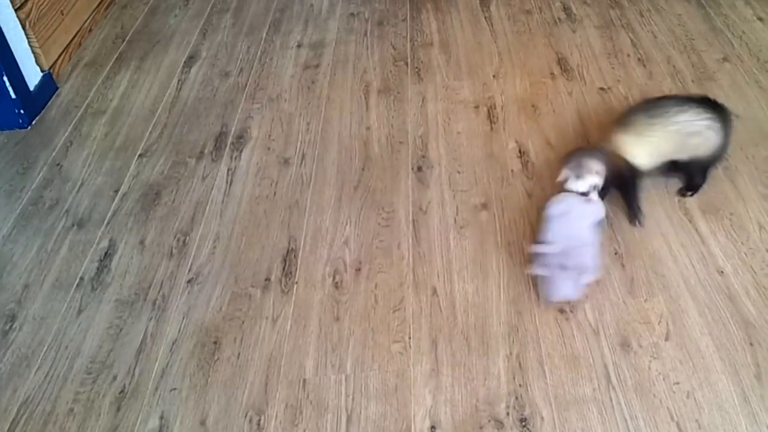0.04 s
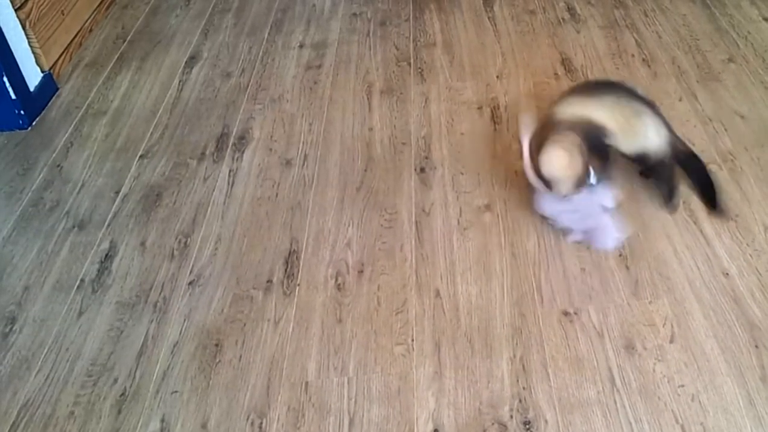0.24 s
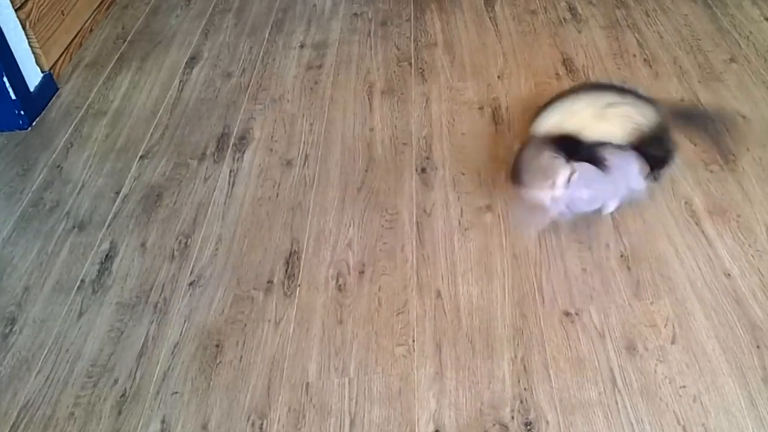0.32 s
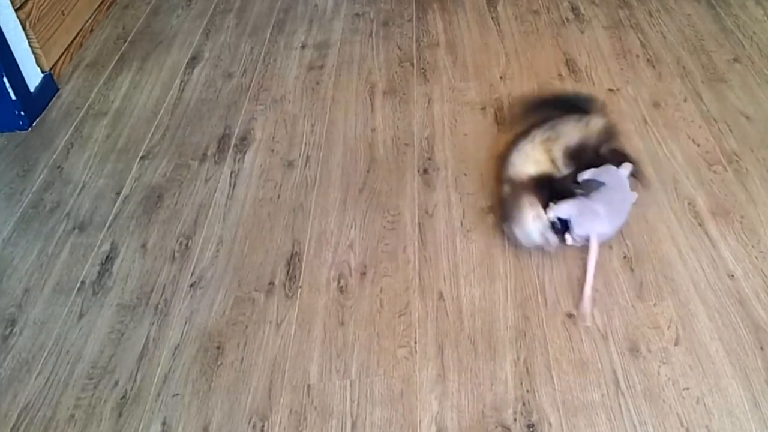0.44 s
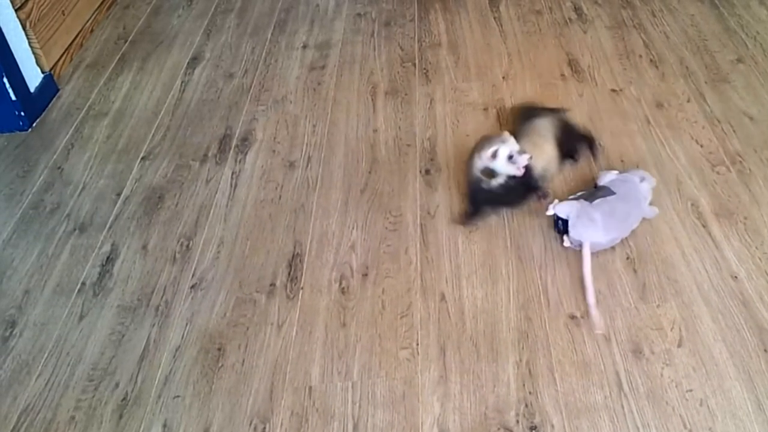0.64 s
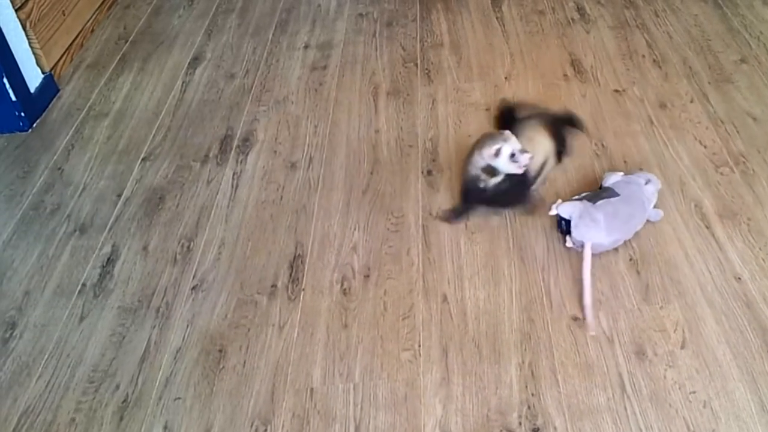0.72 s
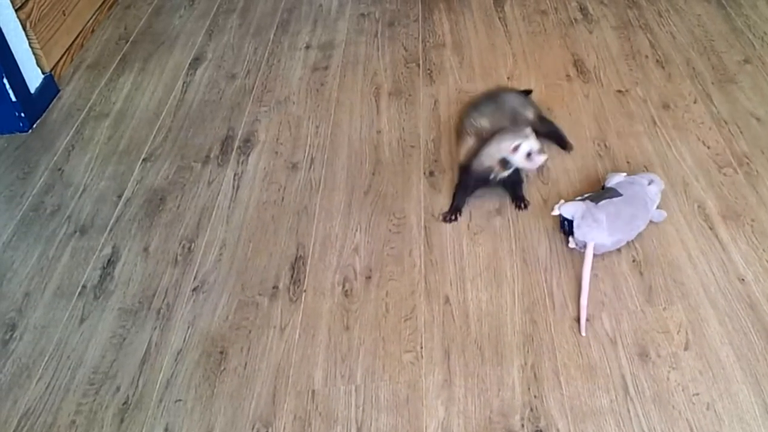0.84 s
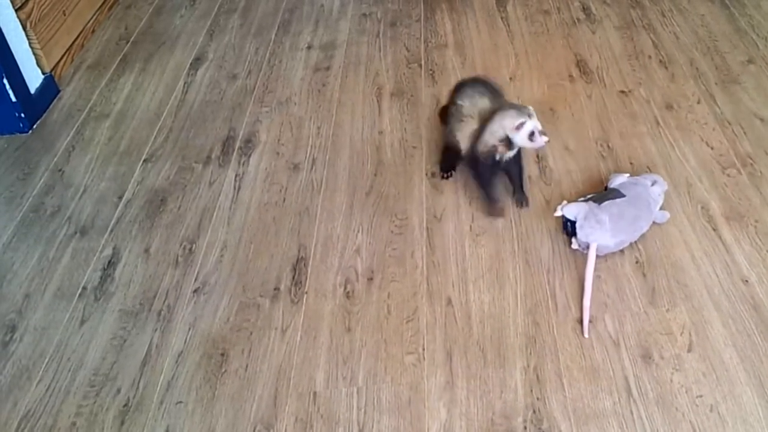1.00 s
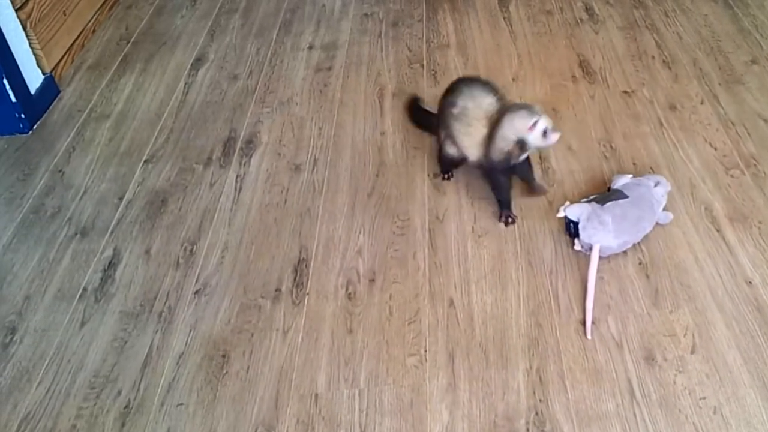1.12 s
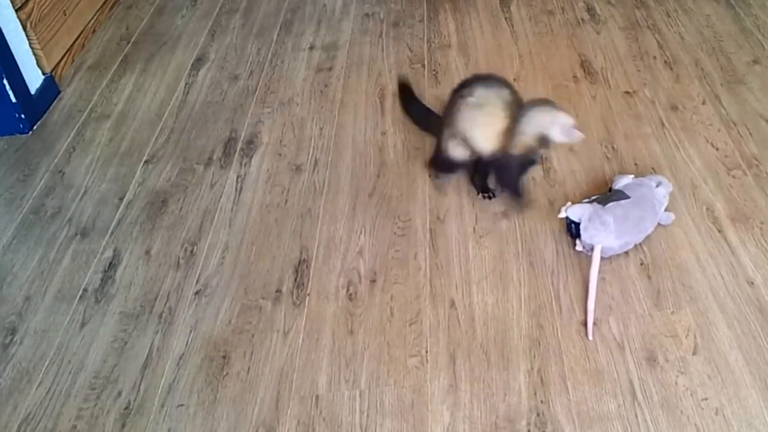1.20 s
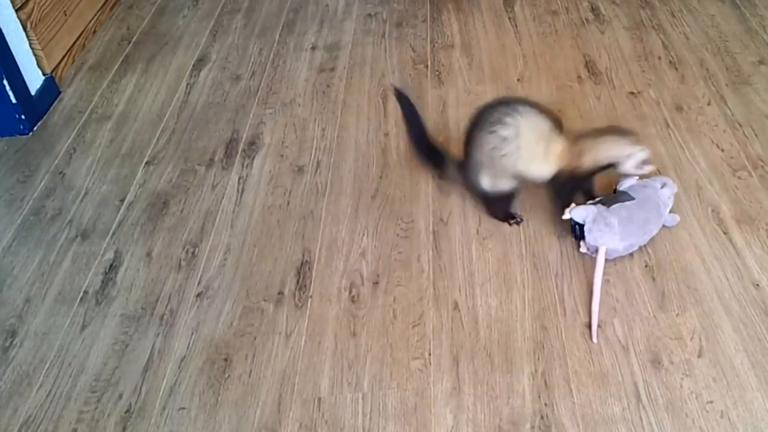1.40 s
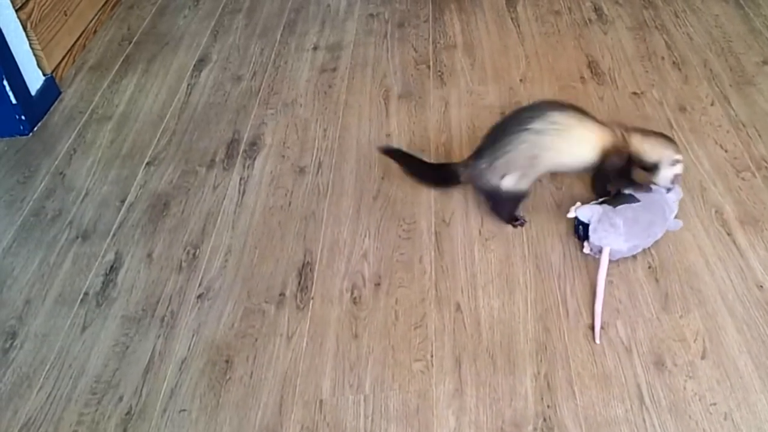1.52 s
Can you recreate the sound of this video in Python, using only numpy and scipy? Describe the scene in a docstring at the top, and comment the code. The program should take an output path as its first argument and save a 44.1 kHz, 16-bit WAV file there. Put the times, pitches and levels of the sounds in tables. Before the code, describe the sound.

A toy knocks three times on a laminate floor as a ferret shakes it, each a clack with a hollow boom. Then claws tick, paws slide and plush scuffs softly in a slightly echoing room.

```python
"""Claws tick and plush scuffs on the laminate floor of a live room: a ferret is shaking a soft toy.
It knocks the toy's hard core down three times, each a clack and a hollow boom of the boards,
then scampers round it, paws thumping and sliding, claws rasping. Two unlike microphone ports
pick it up, left and right, and the hardest knocks overload them."""
import sys
import numpy as np
from scipy import signal
from scipy.fft import rfft, irfft
from scipy.io import wavfile

SR = 44100
rng = np.random.default_rng(int(sys.argv[2]) if len(sys.argv) > 2 else 0)


def wav_record(signal):
    """Record a signal, one row per channel, as 16-bit PCM in the file named by sys.argv[1]."""
    frames = np.transpose(np.atleast_2d(signal))
    bounded = np.clip(frames, -1, 1)
    # unit amplitude maps onto the largest positive 16-bit level
    quanta = np.round(bounded * 32767).astype(np.int16)
    wavfile.write(sys.argv[1], SR, quanta)


N = 68355
T = np.arange(N) / SR


def from_db(db):
    """Decibels to gain."""
    return 10 ** (np.asarray(db) / 20)


def at_hz(points, hz):
    """Read a table on a log-frequency axis."""
    f, v = np.transpose(points)
    return np.interp(np.log(hz), np.log(f), v)


def rms_one(x):
    """Scale to unit rms."""
    return x / np.sqrt(np.mean(x ** 2) + 1e-20)


def colour(x, points):
    """Causal (minimum-phase) filter through points of f/Hz, level/dB."""
    hz = np.maximum(np.fft.rfftfreq(4 * N, 1 / SR), 1)
    cepstrum = irfft(np.log(from_db(at_hz(points, hz))))
    size = len(cepstrum)
    cepstrum[1:size // 2] *= 2
    cepstrum[size // 2 + 1:] = 0
    return irfft(rfft(x, size) * np.exp(rfft(cepstrum)))[..., :N]


def convolve(x, response):
    """Play x through a response, per channel."""
    return signal.fftconvolve(np.atleast_2d(x), np.atleast_2d(response), axes=1)[:, :N]


def impulses(rows):
    """One impulse for each row of t/s, level/dB."""
    out = np.zeros(N)
    for s, db in rows:
        out[max(int(s * SR), 0)] += from_db(db)
    return out


def swell(t, peak_s):
    """An envelope that rises to 1 at peak_s and dies away."""
    return t / peak_s * np.exp(1 - t / peak_s)


def diffuse(alike_below_hz=455):
    """White noise from all round, alike at both ports in the bass only."""
    alike = 1 / (1 + (np.fft.rfftfreq(N, 1 / SR) / alike_below_hz) ** 2)
    spectra = rfft(rng.standard_normal((2, N)))
    mid, side = irfft(spectra * np.sqrt([1 + alike, 1 - alike]), N)
    return np.array([mid + side, mid - side]) / np.sqrt(2)


def room(x, build_s=0.002):
    """The live room: reverberation builds quickly and lingers longest in the bass."""
    decay_times = [(100, 0.78), (350, 0.48), (1000, 0.49), (2500, 0.48), (5000, 0.36), (12000, 0.35)]  # reverberation: f/Hz, t60/s
    edges_hz = [0, 180, 500, 1400, 3500, 7000, SR]
    noise, hz, tail = rfft(diffuse()), np.fft.rfftfreq(N, 1 / SR), 0
    for low, high in zip(edges_hz, edges_hz[1:]):
        band = irfft(noise * ((hz >= low) & (hz < high)), N)
        t60 = at_hz(decay_times, (low + high) / 2)
        tail += band * from_db(-60 * T / t60)
    response = rms_one(tail * (1 - np.exp(-T / build_s))) / np.sqrt(N)
    return convolve(x, response)


def room_tone():
    """The low, steady hush of the room."""
    spectrum = [(25, -8.5), (70, -0.5), (150, 1.5), (330, 5.5), (700, -1.5), (1400, -9.5), (2500, -17),
                (14000, -32)]  # background noise: f/Hz, level/dB
    return from_db(-52) * rms_one(colour(diffuse(), spectrum))


def scuffing(grains_per_s=2100, grain_db=-7.5, spread_db=5):
    """Fur and plush rub the floor: a soft hiss with tiny catches in it."""
    vigour = [(0, -37.5), (.08, -48.5), (.135, -45), (.21, -52), (.24, -39.5), (.29, -35), (.325, -31.5),
              (.40, -34), (.47, -34), (.57, -44), (.64, -36), (.69, -40.5), (.745, -37), (.80, -43.5),
              (.92, -40), (.98, -48), (1.04, -45.5), (1.14, -50.5), (1.19, -47), (1.255, -44), (1.34, -55),
              (1.385, -43), (1.42, -51.5), (1.48, -53.5), (1.55, -45.5)]  # strength of the rubbing: t/s, level/dB
    spectrum = [(100, -20), (240, -8), (400, 9.5), (750, -0.5), (1400, 7), (2000, -0.5), (2500, -1),
                (3400, 2.5), (4700, 4.5), (6000, 7), (8300, -2), (12000, -2.5), (15000, -5.5)]  # fabric hiss: f/Hz, level/dB
    sizes = from_db(spread_db * np.minimum(rng.exponential(1, N), 5))
    catches = rng.random(N) < grains_per_s / SR
    grains = sizes * catches * rng.standard_normal((2, N))
    rub = rms_one(colour(diffuse() + from_db(grain_db) * rms_one(grains), spectrum))
    return from_db(0.5 + np.interp(T, *np.transpose(vigour))) * rub


def paw_scrapes():
    """A paw slides on the laminate: friction bites at once and fades."""
    slides = [(0.0, 0.017, -54), (0.738, 0.097, -34.5), (1.173, 0.073, -47), (1.424, 0.048, -45.5),
              (1.52, 0.04, -39.5)]  # paw slips: t/s, length/s, level/dB
    spectrum = [(200, -21), (600, -0.5), (1600, 8), (2400, 2), (4000, -3), (7000, -10.5), (14000, -29)]  # friction noise: f/Hz, level/dB
    level = 0
    for s, length, db in slides:
        corners_s = [s, s + 0.0021, s + length / 2, s + length * 0.91]
        level += from_db(db) * np.interp(T, corners_s, [0.044, 0.89, 0.59, 0.0095])
    return level * rms_one(colour(diffuse(), spectrum))


def claw_ticks(grit_s=0.003, grit_db=-10, echo_s=0.0024):
    """Claws and hard parts snap with a little grit; a near surface returns a briefly ringing echo."""
    clicks = [(0.002, -13.5, -33, 4380), (0.094, -20.5, -43.5, 4900), (0.13, -24.5, -33, 4920),
              (0.2226, -21.5, -25.5, 4510), (0.3, 0, -11, 4760), (0.4937, -8, -12.5, 4680),
              (0.510, -16.5, -15, 4370), (0.688, -42, -43, 4700), (0.706, -26, -28.5, 4870),
              (0.834, -24, -37.5, 4680), (1.100, -21.5, -28, 5010), (1.1647, -33, -32, 4350),
              (1.2157, -32.5, -32, 4900), (1.22, -39, -35.5, 4410), (1.286, -35, -37, 4610),
              (1.352, -23.5, -34, 4640), (1.503, -37, -48, 4780), (1.522, -27, -33.5, 4500)]  # hard contacts: t/s, snap level/dB, ring level/dB, ring f/Hz
    spectrum = [(300, -19), (1500, -6), (2500, -18), (4700, 2), (7000, -2.5), (14000, -3)]  # the snap: f/Hz, level/dB
    snap_gain, echo_gain = from_db([[-0.5], [3]]), from_db([[-8.5], [-2.5]])  # left, right
    hits = impulses([row[:2] for row in clicks])
    grit = from_db(grit_db) * convolve(hits, np.exp(-T / grit_s))[0] * rng.standard_normal(N)
    snap = colour(hits + grit, spectrum)
    echo, t = np.zeros(N), T[:SR // 100]
    for s, _, ring_db, hz in clicks:
        phase = 2 * np.pi * hz * t
        ring = np.sin(phase) + from_db(-5.5) * np.cos(0.89 * phase)  # with a weaker, lower mode
        start = int((s + echo_s) * SR)
        echo[start:start + len(t)] += from_db(ring_db) * swell(t, peak_s=0.00086) * ring
    reverb = room(from_db(-2) * snap + from_db(-7.5) * echo)
    return snap_gain * snap + echo_gain * echo + reverb


def floor_thumps(room_db=-22):
    """The hollow floor answers each landing with a short, swelling boom."""
    landings = [(0.006, -26.5), (0.115, -35.5), (0.223, -1.5), (0.2965, 16), (0.427, -1), (0.472, -8),
                (0.495, 6.5), (0.512, 11), (0.574, -6), (0.627, -22.5), (0.665, -21), (0.700, -13.5),
                (0.985, -33.5), (1.055, -29.5), (1.112, -37), (1.240, -35.5), (1.357, -28.5),
                (1.426, -35.5), (1.495, -37.5)]  # weight of toy, body or paw on the boards: t/s, level/dB
    board_modes = [(148, -54, -39.5, 0.03), (226.6, -22.5, -29.5, 0.021), (267.2, -18, -21, .018),
                   (336.3, -3, -13, 0.013), (422.8, -19.5, -17, 0.015)]  # resonances: f/Hz, left level/dB, right level/dB, rise/s
    boom = 0
    for hz, left_db, right_db, peak_s in board_modes:
        envelope = swell(T, peak_s) ** 4.06
        boom += from_db([[left_db], [right_db]]) * envelope * np.sin(2 * np.pi * hz * T)
    direct = convolve(impulses(landings), boom)
    return direct + from_db(room_db) * room(direct)


def body_flops(right_db=-13.5):
    """The soft body flops on the floor: dull, low thuds, mostly in the left port."""
    falls = [(0.114, -42.5), (0.225, -32), (0.425, -19), (0.497, -22), (0.61, -34), (0.66, -33),
             (0.77, -49), (1.055, -54)]  # soft landings: t/s, level/dB
    spectrum = [(25, -22), (55, -16.5), (90, -9), (140, 0), (200, 1.5), (300, -14), (700, -41.5),
                (3000, -77)]  # the thud: f/Hz, level/dB
    envelope = convolve(impulses(falls), swell(T, peak_s=0.021) ** 2)
    return envelope * rms_one(colour(diffuse(), spectrum)) * from_db([[0], [right_db]])


def toy_knocks():
    """The hard core rings toy and boards and fills the room; the third knock strikes twice."""
    contacts = [(0.2234, -0.5, -3.5, 1520), (0.2966, 13.5, -6.5, 2780), (0.4929, -1.5, 5.5, 5030),
                (0.5100, 4.5, -4, 4040)]  # core on floor: t/s, level/dB, relative room send/dB, low-pass f/Hz
    modes = [(405.5, -15.5, 0.079), (517, -10.5, 0.037), (609, -12.5, 0.026), (816, -14, 0.044),
             (975, -20, 0.096), (1115, -19, 0.05), (1258, -21.5, .05), (1557, -24.5, 0.04),
             (2260, -19, .015), (3208, -25.5, 0.027)]  # resonances of toy and floor: f/Hz, level/dB, t60/s
    room_spectrum = [(30, -35.5), (90, -16), (170, -14), (260, 6), (340, -1.5), (430, 6.5), (600, -2),
                     (800, -5.5), (1030, -3), (1500, -11), (2500, -21.5), (4500, -20), (8000, -34.5),
                     (14000, -41.5)]  # the clack as the room returns it: f/Hz, level/dB
    ring = sum(from_db(db - 60 * T / t60) * np.cos(2 * np.pi * hz * T) for hz, db, t60 in modes)
    direct = 0
    for s, db, _, contact_hz in contacts:
        clack = signal.lfilter(*signal.butter(2, contact_hz, fs=SR), ring)
        direct += convolve(impulses([(s, db)]), clack)
    sent = impulses([(s, db + send_db) for s, db, send_db, _ in contacts])
    return direct + from_db(31.5) * room(colour(sent, room_spectrum))


def claw_rasps(left_db=-6):
    """A claw drags, right of centre: friction excites one thin, narrow resonance."""
    drags = [(0.576, 0.18, -47, 4600, 394), (0.817, 0.16, -46, 4720, 197), (0.99, 0.084, -43.5, 5650, 600),
             (1.218, 0.047, -45.5, 4700, 704), (1.373, 0.029, -46.5, 4600, 800)]  # claw slides: t/s, length/s, level/dB, f/Hz, width/Hz
    out = 0
    for s, length, db, hz, width_hz in drags:
        level = from_db(db) * np.interp(T, s + length * np.array([0, .25, .75, 1]), [0, 1, 1, 0])
        resonance = signal.iirpeak(hz, hz / width_hz, fs=SR)
        out += level * rms_one(signal.lfilter(*resonance, rng.standard_normal((2, N))))
    return out * from_db([[left_db], [0]])


def scene():
    """The tussle over quiet room tone, as it reaches the microphone."""
    return (room_tone() + scuffing() + paw_scrapes() + claw_ticks()
            + floor_thumps() + body_flops() + toy_knocks() + claw_rasps())


def record(dry):
    """Each microphone port colours the sound, loud peaks flatten and the top is cut."""
    left_port = [(60, -3.5), (250, 0.5), (430, 0.5), (1800, 1.5), (2700, -3.5), (3200, 1), (4600, -4.5),
                 (8500, -1), (10500, 6.5), (13500, 9), (15000, -30.5)]  # left response: f/Hz, level/dB
    right_port = [(60, -2), (250, -13), (430, 0), (1800, -0.5), (2700, 4.5), (3700, 7), (4600, 10.5),
                  (5200, 8.5), (5700, 0), (8500, 0.5), (10500, -6), (15000, -19.5)]  # right response: f/Hz, level/dB
    drive_db, knee, cutoff_hz = -1, 9, 15000
    picked_up = from_db(drive_db) * np.array([colour(dry[0], left_port), colour(dry[1], right_port)])
    clipped = picked_up / (1 + np.abs(picked_up) ** knee) ** (1 / knee)
    return signal.sosfilt(signal.ellip(10, .1, 70, cutoff_hz, fs=SR, output="sos"), clipped)


dry = scene()
out = record(dry)
wav_record(out)
```